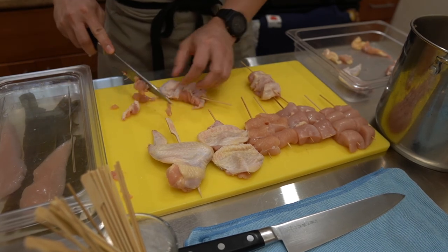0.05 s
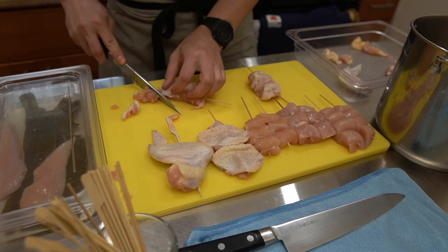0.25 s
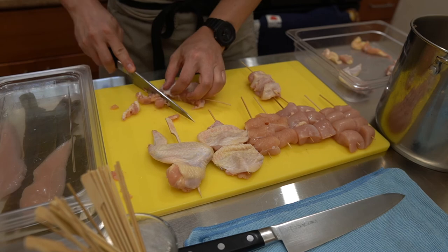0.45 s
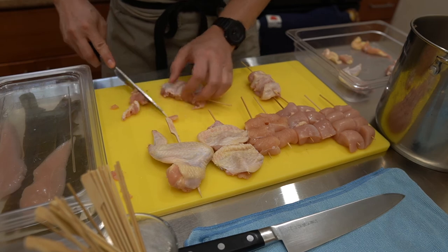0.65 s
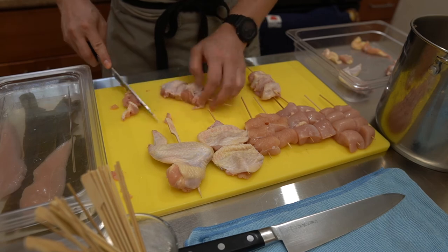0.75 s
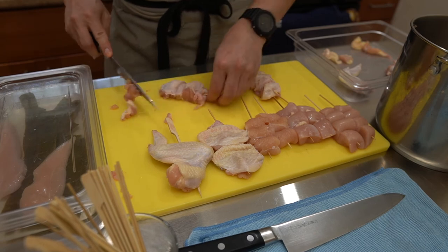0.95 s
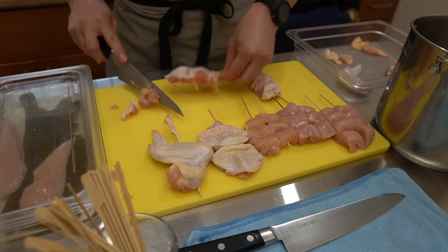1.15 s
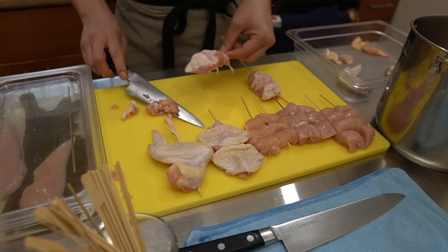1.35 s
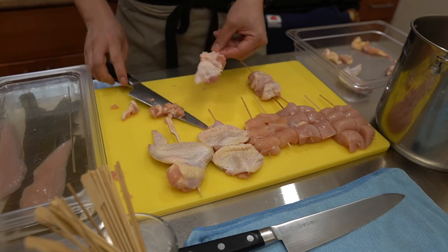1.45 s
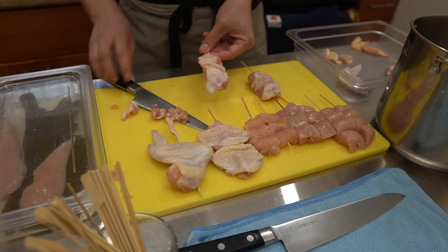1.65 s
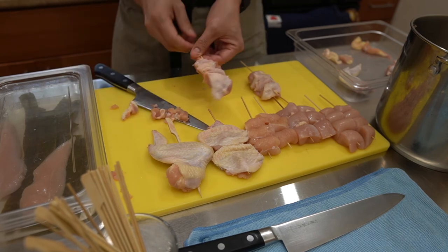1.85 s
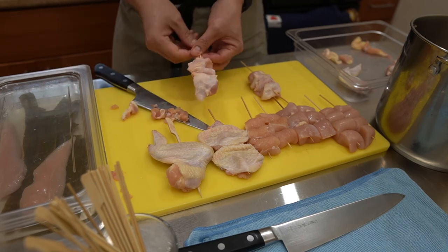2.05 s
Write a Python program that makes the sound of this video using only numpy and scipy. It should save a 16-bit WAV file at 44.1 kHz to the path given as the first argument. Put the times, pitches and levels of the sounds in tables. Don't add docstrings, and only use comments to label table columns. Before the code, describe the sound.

Close up in a quiet rumbling kitchen, a knife cracks down on a plastic board, drags in a short gritty scrape, pauses with tiny wet meat snaps, then clacks flat with a thin metallic ring and knocks again with its handle.

```python
import sys
import numpy as np
from scipy import signal
from scipy.fft import rfft, irfft
from scipy.io import wavfile
from scipy.ndimage import uniform_filter1d

SR = 44100
rng = np.random.default_rng(int(sys.argv[2]) if len(sys.argv) > 2 else 0)


def ratio_of_db(decibels):
    return 10 ** (np.asarray(decibels, float) / 20)


def put_to_file(sound):
    columns = np.atleast_2d(sound).T
    safe = np.clip(columns, -1, 1)
    whole_steps = np.round(safe * 32767)
    wavfile.write(sys.argv[1], SR, whole_steps.astype(np.int16))


N = 92610

# (frequency [Hz], width [Hz], level [dB])
SCRAPED_BOARD = [(383, 34, 8), (530, 29, -3.5), (760, 64, 3.5), (875, 120, -1.5), (1060, 160, -8.5),
                 (1440, 170, -16), (1770, 180, -9.5)]
SCRAPE_LOW_HZ = 420


def evened(x):
    return x / np.sqrt(np.mean(x ** 2) + 1e-20)


def read_spectrum(points, hz):
    f, db = np.transpose(points)
    return np.interp(np.log(hz + 1), np.log(f + 1), db)


def gain_curve(points, t):
    s, db = np.transpose(points)
    return ratio_of_db(np.interp(t, s, db, left=-140, right=-140))


def add(mix, s, sound):
    part = mix[round(s * SR):][:len(sound)]
    part += sound[:len(part)]


def colour(x, spectrum):
    log_gain = np.log(ratio_of_db(read_spectrum(spectrum, np.fft.rfftfreq(8192, 1 / SR))))
    full = np.r_[log_gain, log_gain[-2:0:-1]]
    taps = np.fft.ifft(np.exp(np.conj(signal.hilbert(full)))).real[:4096]
    return signal.fftconvolve(x, taps)[:len(x)]


def band(x, hz, sharpness):
    return signal.lfilter(*signal.iirpeak(hz, sharpness, SR), x)


def no_bass(x, low_hz=130):
    return signal.sosfilt(signal.butter(2, low_hz, "high", fs=SR, output="sos"), x)


def ring(modes, t):
    total = sum(ratio_of_db(db - 60 * t / t60) * np.sin(2 * np.pi * hz * t) for hz, db, t60 in modes)
    return -total


def body_response(body):
    u = np.arange(4096) / SR
    return sum(ratio_of_db(db) * width * np.exp(-np.pi * width * u) * np.sin(2 * np.pi * hz * u)
               for hz, width, db in body)


def rings(x, body):
    return signal.fftconvolve(x, body_response(body))[:len(x)]


def room(x):
    # (frequency [Hz], time to fall 60 dB [s])
    kitchen = [(150, 0.43), (400, 0.65), (1000, 0.6), (2500, 0.56), (6000, 0.59), (14000, 0.32)]
    first = int(0.0018 * SR)
    taps = np.zeros(SR)
    at = np.arange(0, SR - 20, 20) + rng.integers(0, 20, (SR - 1) // 20)
    taps[at] = rng.choice([-1., 1.], len(at))
    hz, t, z = signal.stft(taps, SR, nperseg=256)
    fade = ratio_of_db(-60 * t / read_spectrum(kitchen, hz)[:, None])
    tail = signal.istft(z * fade, SR, nperseg=256)[1]
    tail = np.r_[np.zeros(first), tail]
    return signal.fftconvolve(x, tail / np.linalg.norm(tail))[:N]


def echoed(x):
    # (delay [s], level [dB])
    echoes = [(.0078, -12), (0.0125, -11.5), (0.0228, -10)]
    out = x.copy()
    for s, db in echoes:
        add(out, s, ratio_of_db(db) * x)
    return out


def air():
    # (frequency [Hz], level [dB per Hz])
    hush_spectrum = [(59, -20), (100, -20.5), (129, -1), (156, -13.5), (320, -18), (1000, -23.5),
                     (1140, -28), (2240, -29.5), (15700, -47.5)]
    # (frequency [Hz], level [dB per Hz])
    rumble_spectrum = [(8.8, -39.5), (15, 6), (30, 3.5), (48, -16.5), (91, -15.5), (119, -19), (200, -23.5),
                       (260, -56), (440, -120)]
    hush_db, rumble_db = -63.5, -53
    hz = np.fft.rfftfreq(N, 1 / SR)
    hush = evened(irfft(rfft(rng.standard_normal(N)) * ratio_of_db(read_spectrum(hush_spectrum, hz)), N))
    rumble = evened(irfft(rfft(rng.standard_normal(N)) * ratio_of_db(read_spectrum(rumble_spectrum, hz)), N))
    smooth = uniform_filter1d(rng.standard_normal(N), size=2500)
    lumps = evened(uniform_filter1d(smooth, size=2500))
    return ratio_of_db(hush_db + 1.0 * lumps) * hush + ratio_of_db(rumble_db + 0.2 * lumps) * rumble


def touches():
    # (time [s], level [dB], frequency [Hz])
    thumps = [(0.345, -31.5, 42), (0.464, -36.5, 44), (0.572, -38, 56.4), (0.675, -23.5, 111),
              (0.929, -41.5, 41.7), (1.237, -31, 41), (1.583, -28.5, 34.4), (1.666, -36, 51),
              (1.829, -36.5, 68)]
    # (time [s], level [dB], frequency [Hz], 60 dB fade [s])
    nudges = [(.462, -43, 390, .08), (.930, -50, 210, .25), (.938, -42, 510, .06), (1.525, -55, 1050, .05)]
    # (time [s], level [dB])
    drag_curve = [
        (.04, -90),
        (.10, -63.5),
        (.14, -72),
        (.2, -102),
    ]
    rise_s, drag_hz, drag_width_hz = .008, 870, 430
    out, t = np.zeros(N), np.arange(SR // 4) / SR
    for s, db, hz in thumps:
        swell = (hz * t) * np.exp(1 - 2.37 * hz * t)
        add(out, s, ratio_of_db(db) * np.sin(2 * np.pi * hz * t) * swell)
    for s, db, hz, t60 in nudges:
        add(out, s, ring([(hz, db, t60)], t) * np.minimum(t / rise_s, 1))
    drag = band(rng.standard_normal(N), drag_hz, drag_hz / drag_width_hz)
    return out + evened(drag) * gain_curve(drag_curve, np.arange(N) / SR)


def handling():
    # (time [s], level [dB])
    shift_curve = [(.92, -59), (1.0, -64.5), (1.2, -66.5), (1.23, -67), (1.44, -67.5), (1.5, -60),
                   (1.56, -66), (1.58, -86)]
    # (time [s], level [dB])
    draw_curve = [
        (.46, -88),
        (.52, -72.5),
        (.6, -72),
        (.63, -95),
    ]
    now, (low, high) = np.arange(N) / SR, rng.standard_normal((2, N))
    dull = evened(no_bass(band(low, 345, .9)))
    bright = evened(band(high, 3000, .8))
    return dull * gain_curve(shift_curve, now) + bright * gain_curve(draw_curve, now)


def ticks():
    # (time [s], peak level [dB], frequency [Hz])
    snaps = [(0.0194, -55.5, 6400), (0.029, -62, 9000), (0.17, -69, 8000), (0.186, -64, 2900),
             (0.469, -60, 6260), (0.906, -55, 8000), (0.993, -66, 8000), (1.034, -56, 5300),
             (1.0478, -60, 10600), (1.059, -56, 5560), (1.075, -57, 5370), (1.0815, -55.5, 5240),
             (1.102, -46.5, 4800), (1.1127, -56.5, 8300), (1.384, -54, 8800), (1.418, -55, 7800),
             (1.4272, -49, 7660), (1.458, -68, 8000), (1.567, -48.5, 4500), (1.66, -59, 10000)]
    # (time [s], level [dB])
    squelch = [
        (1.02, -85),
        (1.05, -74),
        (1.085, -72),
        (1.12, -84),
        (1.14, -98),
    ]
    # (time [s], pitch [Hz], level [dB])
    squeak = [
        (.49, 4200, -88),
        (.515, 4900, -72),
        (.545, 5600, -71),
        (.56, 5000, -78),
        (.6, 4900, -88),
    ]
    t60, sharpness, room_db = 0.0048, 1.6, -10
    out, t, now = np.zeros(N), np.arange(800) / SR, np.arange(N) / SR
    for s, db, hz in snaps:
        burst = rng.standard_normal(800) * t * ratio_of_db(-60 * t / t60)
        snap = band(band(burst, hz, sharpness), hz, sharpness)
        add(out, s, ratio_of_db(db) * snap / np.abs(snap).max())
    fizz = rng.standard_normal(N) * (rng.random(N) < 1500 / SR)
    out += evened(band(fizz, 7000, .8)) * gain_curve(squelch, now)
    s, hz, db = np.transpose(squeak)
    waver = evened(uniform_filter1d(rng.standard_normal(N), size=60))
    turns = np.cumsum(np.interp(now, s, hz)) / SR
    out += np.sin(2 * np.pi * turns) * waver * gain_curve(np.c_[s, db], now)
    return out + ratio_of_db(room_db) * room(out)


def hums():
    # (time [s], length [s], level [dB], first pitch [Hz], last pitch [Hz])
    notes_heard = [(.232, 0.026, -28, 543, 535), (0.253, 0.081, -29.5, 690, 694),
                   (.268, 0.039, -33, 264, 255), (.278, 0.036, -32, 827, 849), (0.31, 0.056, -38, 690, 690),
                   (.38, 0.068, -47, 500, 500), (.626, .055, -34, 745, 761), (.632, 0.027, -35, 875, 870),
                   (0.643, 0.023, -33.5, 1097, 1120), (.64, .04, -39.5, 500, 514),
                   (0.692, 0.069, -34, 382.8, 372), (0.759, 0.062, -42, 364.4, 364.5),
                   (.715, 0.038, -37.5, 866, 837), (0.744, 0.067, -39, 714, 726),
                   (.705, 0.039, -39, 522, 515), (.72, 0.069, -40, 611, 589), (.8, 0.024, -49.5, 490, 500),
                   (.632, 0.031, -34, 1010, 1032), (.72, 0.086, -50.5, 202, 205),
                   (1.255, 0.093, -39.5, 509.8, 480.4), (1.311, 0.074, -44.5, 427.4, 353),
                   (1.388, 0.06, -47, 405, 409), (1.454, 0.063, -57.5, 411, 385),
                   (1.269, 0.039, -48, 272, 274), (1.605, 0.046, -39.5, 495, 500),
                   (1.635, 0.043, -43, 789, 820), (1.632, .04, -42, 408, 472),
                   (1.675, 0.032, -42, 492, 458), (1.73, 0.057, -54.5, 508, 499)]
    out = np.zeros(N)
    for s, length, db, first_hz, last_hz in notes_heard:
        u = np.linspace(0, 1, int(1.17 * length * SR))
        turns = np.cumsum(first_hz + (last_hz - first_hz) * u) / SR
        swell = np.sin(np.pi * u ** 0.68)
        add(out, s, ratio_of_db(db) * swell * np.sin(2 * np.pi * turns))
    return out


def settle():
    # (time [s], level [dB])
    slide_curve = [
        (1.222, -66.5),
        (1.32, -68.5),
        (1.42, -69.5),
        (1.47, -80),
    ]
    # (frequency [Hz], level [dB])
    steel_notes = [(5040, 3), (9630, -4.5), (11770, -8), (7300, -5)]
    width_hz, board_db = 120, 18.5
    rub = rng.standard_normal(N) * gain_curve(slide_curve, np.arange(N) / SR)
    steel = [(hz, width_hz, db) for hz, db in steel_notes]
    board = SCRAPED_BOARD[:4]
    steel_sound = rings(rub, steel) / np.linalg.norm(body_response(steel))
    board_sound = no_bass(rings(rub, board), SCRAPE_LOW_HZ) / np.linalg.norm(body_response(board))
    return steel_sound + ratio_of_db(board_db) * board_sound


def scrape():
    # (time [s], pressure on board [dB], edge speed [dB], nearness to the rim [0-1])
    path = [(0.614, -79, -71, 0.9), (0.62, -71, -50, 0.2), (.634, -33, -41, 0.89),
            (0.647, -29.5, -36, 0.52), (0.688, -36.5, -44, 0.82), (0.727, -30.5, -68, 0.13),
            (0.784, -37.5, -50, 0.88), (.812, -83, -55.5, 0.2), (0.829, -74, -65, 0.3)]
    # (frequency [Hz], width [Hz], level [dB])
    edge_notes = [(2120, 79, 6.5), (2850, 460, 6), (3224, 91, 2), (4330, 200, 8), (4860, 28, -23),
                  (5630, 210, -5.5), (5900, 55, -29), (6460, 27, -25), (7230, 33, -35), (8040, 70, -39),
                  (10500, 350, -9.5), (11200, 30, -20), (12900, 160, -12), (14800, 190, -21)]
    # (frequency [Hz], level [dB per Hz])
    hiss_spectrum = [(120, -59), (200, -10.5), (515, 9.5), (641, -12), (755, -7.5), (1260, -7.5),
                     (4410, -28), (15500, -40)]
    slip_spread_db, slips_per_s = 2.5, 9000
    rim_hz, rim_db = 620, 18.5
    board_db, edge_db, hiss_db, room_db = -4, -1, 5.5, -4.5
    t, one = np.arange(N) / SR, 1. * (np.arange(4096) == 0)
    sizes = ratio_of_db(slip_spread_db * np.minimum(rng.exponential(1, N), 4))
    signs = np.sign(rng.standard_normal(N))
    slips = evened(sizes * signs * (rng.random(N) < slips_per_s / SR))
    s, press_db, speed_db, rim = np.transpose(path)
    press = slips * gain_curve(np.c_[s, press_db], t)
    speed = slips * gain_curve(np.c_[s, speed_db], t)
    lean = ratio_of_db(rim_db * (np.interp(t, s, rim) - .5))
    high = [m for m in SCRAPED_BOARD if m[0] > rim_hz]
    low = [m for m in SCRAPED_BOARD if m[0] <= rim_hz]
    board = rings(press * lean, high) + rings(press / lean, low)
    board /= np.linalg.norm(body_response(SCRAPED_BOARD))
    edge = rings(speed, edge_notes) / np.linalg.norm(body_response(edge_notes))
    hiss = colour(speed, hiss_spectrum) / np.linalg.norm(colour(one, hiss_spectrum))
    out = ratio_of_db(board_db) * board + ratio_of_db(edge_db) * edge + ratio_of_db(hiss_db) * hiss
    out = no_bass(no_bass(out, SCRAPE_LOW_HZ), SCRAPE_LOW_HZ)
    return out + ratio_of_db(room_db) * room(out)


def blade():
    # (frequency [Hz], level [dB], 60 dB fade [s])
    steel = [(3920, 4.5, 0.041), (5020, 2.5, 0.047), (5170, -4, 0.048), (6060, -6, 0.062),
             (7450, -9.5, .05), (8060, -11, 0.038), (9700, -3.5, 0.045), (11300, -10.5, 0.05),
             (11970, -24, .08), (14200, -16, 0.033)]
    # (time [s], level [dB])
    hits = [
        (1.2198, -38),
        (1.258, -61),
        (1.275, -55),
        (1.3076, -60),
        (1.3835, -65),
        (1.4262, -68),
    ]
    longest_t60, room_db = 0.02, -11.5
    out, t = np.zeros(N), np.arange(SR // 2) / SR
    damped = [(hz, db, min(t60, longest_t60)) for hz, db, t60 in steel]
    for s, db in hits:
        add(out, s, ratio_of_db(db) * ring(damped, t))
    return echoed(out) + ratio_of_db(room_db) * room(out)


def knocks():
    # (time [s], ring level [dB], crack level [dB], 60 dB fade of the ring [s], room level [dB])
    blows = [
        (0.2221, -6.5, -10.5, 0.0097, 0.5),
        (1.2196, -18.5, -22.5, 0.036, -9),
        (1.5654, -17, -17, 0.058, -8),
    ]
    weight_lags = (0, 0, .0015)
    # (frequency [Hz], level [dB], 60 dB fade [s])
    chop = [(139, -15.5, 0.14), (268.8, -14.5, 0.28), (405, -5.5, 0.097), (501.2, -9.5, 0.52),
            (718, -0.5, 0.07), (865.6, -4.5, 0.2), (1115, -18, 0.09), (1286, -20, 0.19), (1835, -21, 0.067),
            (2008, -29, 0.36), (2270, -25.5, 0.18), (2700, -31.5, 0.14)]
    flat = [(393.8, -7.5, 0.2), (500, -6, 0.62), (721, -9.5, 0.23), (896, -9, 0.26), (1013, -17, 0.33),
            (1250, -29, 0.81), (1500, -18, 2.3), (1590, -45, 1.1), (2125, -19, 0.38), (2180, -9, 0.04),
            (2940, -15.5, 0.036), (3020, -31, 3.9)]
    handle = [(198.7, -14, 0.34), (378.5, -2.5, 0.22), (690, -9, 0.24), (975, -23, 0.23), (1512, -5, 0.027),
              (2155, -17, 0.58), (2880, -9, 0.021)]
    # (frequency [Hz], level [dB per Hz])
    chop_crack = [(130, -21), (300, -10), (700, -6), (1300, -11.5), (1600, -22.5), (2500, -25),
                  (3200, -34.5), (15500, -62)]
    flat_crack = [(59, -59), (100, -7), (508, 0), (1230, -14.5), (2130, -18), (5170, -31), (9950, -37),
                  (15500, -56)]
    handle_crack = [(59, -31), (100, -5), (209, -9), (281, -13), (378, -4.5), (640, -6), (2000, -12.5),
                    (15500, -65)]
    contact_s, linger_db, longest_t60 = .00022, -10.5, .3
    crack_t60, crack_soft_s, snap_low_hz = 0.018, .00003, 550
    out, t = np.zeros(N), np.arange(SR // 2) / SR
    press = 1 - np.exp(-t / contact_s)
    keep = np.exp(-1 / (SR * crack_soft_s))
    bodies, cracks = (chop, flat, handle), (chop_crack, flat_crack, handle_crack)
    for (s, ring_db, crack_db, t60, room_db), lag, modes, crack in zip(blows, weight_lags, bodies, cracks):
        damped = [(hz, db, min(late, longest_t60)) for hz, db, late in modes]
        fade = ratio_of_db(-60 * t / t60) + ratio_of_db(linger_db)
        body = no_bass(press ** 2 * ring(damped, t)) * fade
        blow = colour(-1. * (t == 0), crack)
        blow /= np.linalg.norm(blow) / 2
        rattle = rng.standard_normal(len(t)) * press * ratio_of_db(-60 * t / crack_t60)
        rattle = signal.lfilter([1 - keep], [1, -keep], rattle)
        snap = no_bass(signal.fftconvolve(rattle, blow)[:len(t)], snap_low_hz)
        snap /= np.abs(snap).max()
        ringing, sharp, into_room = np.zeros((3, N))
        add(ringing, s + lag, ratio_of_db(ring_db) * body)
        add(sharp, s, ratio_of_db(crack_db) * snap)
        add(into_room, s, ratio_of_db(room_db) * blow)
        out += ringing + echoed(sharp) + room(into_room)
    return out


def scene():
    background = air() + touches() + handling() + ticks()
    knife = hums() + settle() + scrape() + blade() + knocks()
    return (background + knife)[None]


def band_limit(x):
    return signal.sosfilt(signal.butter(12, 16410, fs=SR, output="sos"), x)


def record(dry):
    lowpass = signal.firwin(255, 15900, window=("kaiser", 8), fs=SR)
    mix = signal.oaconvolve(dry, lowpass[None], "same")
    return band_limit(mix)


dry = scene()
out = record(dry)
put_to_file(out)
```